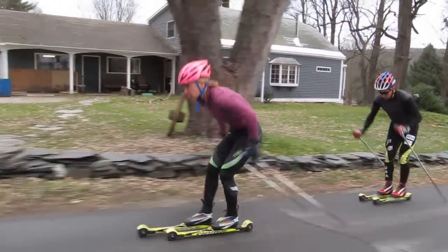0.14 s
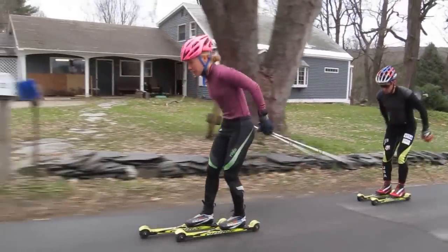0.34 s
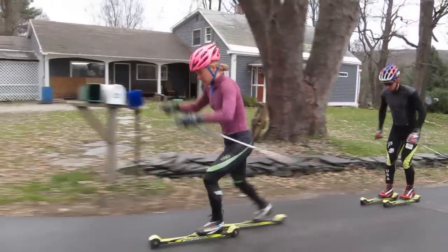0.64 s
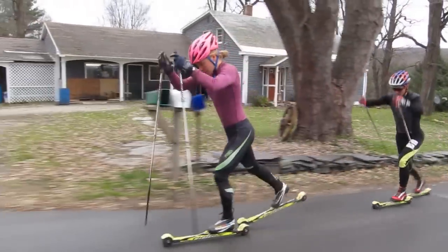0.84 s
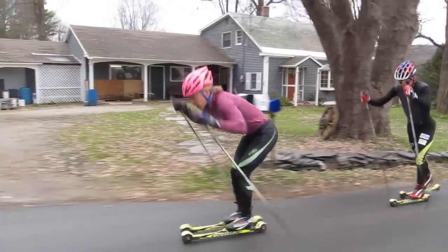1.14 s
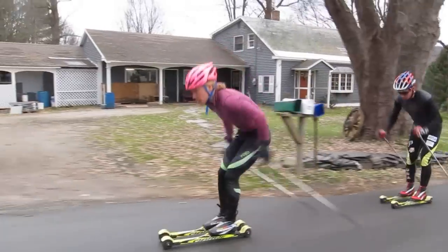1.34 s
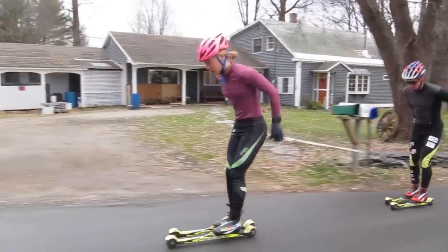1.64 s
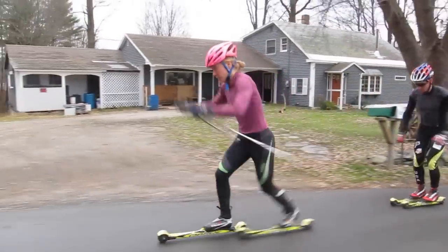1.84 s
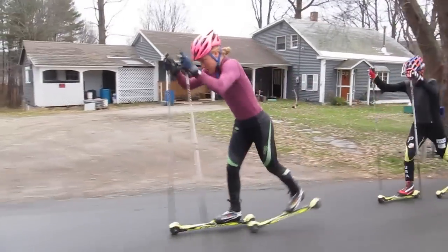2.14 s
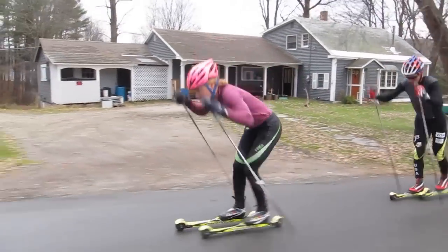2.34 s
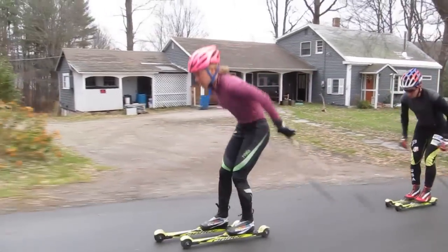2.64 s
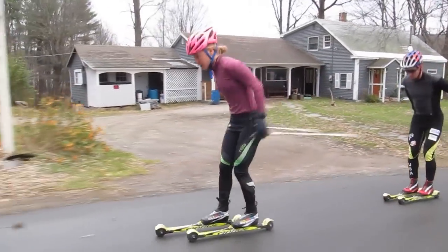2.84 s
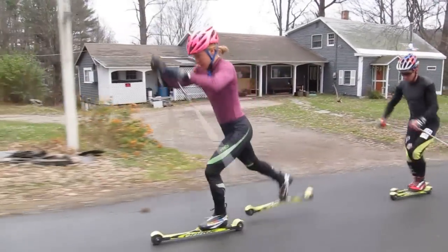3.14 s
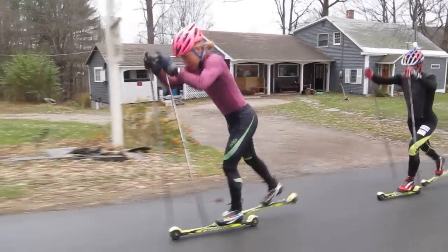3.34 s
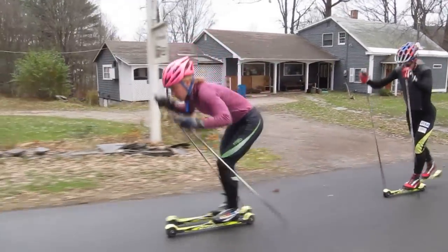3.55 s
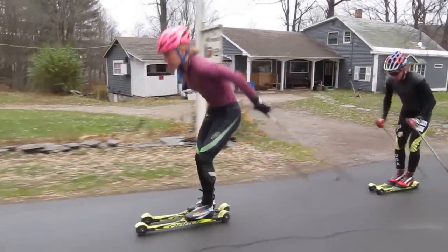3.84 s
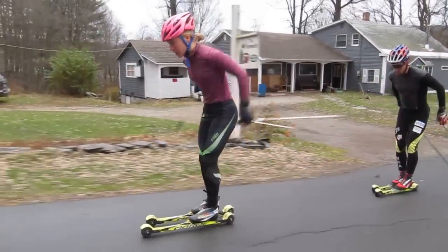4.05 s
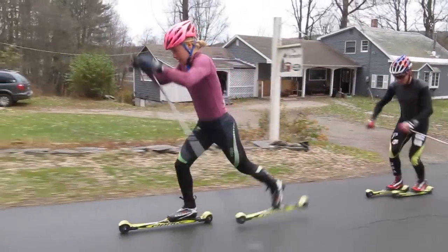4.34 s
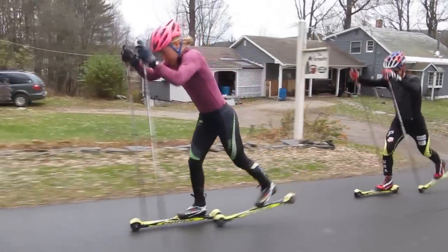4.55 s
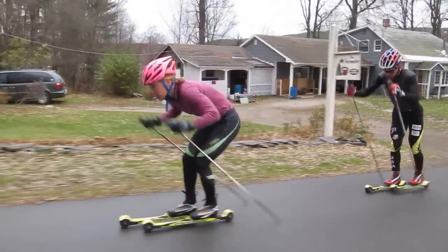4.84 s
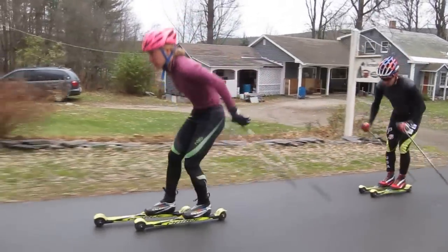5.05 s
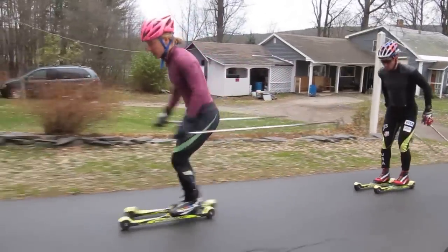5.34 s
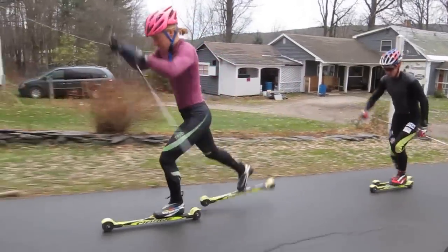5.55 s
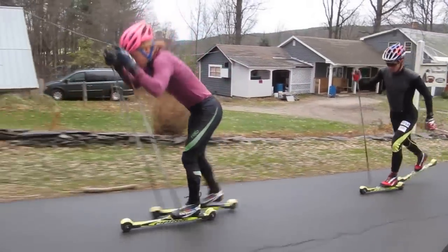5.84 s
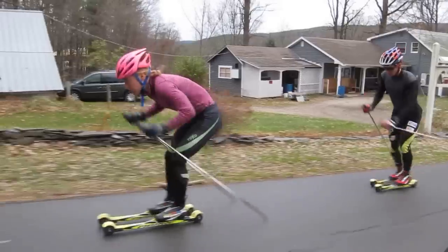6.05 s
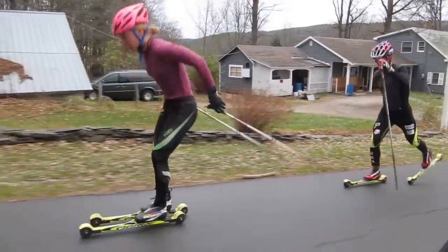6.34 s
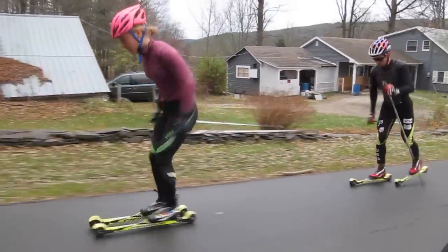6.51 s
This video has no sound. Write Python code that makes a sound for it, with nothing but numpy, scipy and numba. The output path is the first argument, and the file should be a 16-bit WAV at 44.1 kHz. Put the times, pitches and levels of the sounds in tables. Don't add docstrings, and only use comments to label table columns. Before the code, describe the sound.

Two roller skiers travel beside the microphone on a wet road. Loud irregular gusts slap and thud at first, nearly hiding the rolling. After they ease, small wheels hiss and drone softly, spitting tiny grit clicks. Paired sharp pole plants ring briefly and dry in a steady rhythm, the farther ones often loudest. A short flurry of wind bumps returns at the end.

```python
import sys
import numpy as np
from scipy import signal
from scipy.fft import rfft, irfft, next_fast_len
from scipy.io import wavfile
from scipy.ndimage import uniform_filter1d
from numba import njit

SR = 44100
rng = np.random.default_rng(int(sys.argv[2]) if len(sys.argv) > 2 else 0)


def pcm_store(signal):
    levels = np.round(np.clip(np.atleast_2d(signal), -1, 1) * 32767)
    wavfile.write(sys.argv[1], SR, levels.astype(np.int16).T)


def makeup_ratio(level_db):
    decades = np.asarray(level_db, float) / 20
    return 10 ** decades


N = 294588


def level(x, db):
    return x * makeup_ratio(db) / np.sqrt(np.mean(x ** 2))


def curve(table):
    return np.interp(np.arange(N) / SR, *np.transpose(table))


def colour(x, points):
    hz, db = np.transpose(points)
    size = next_fast_len(x.shape[-1])
    f = np.log(np.maximum(np.arange(size // 2 + 1) * SR / size, 1))
    gain = makeup_ratio(np.interp(f, np.log(hz), db, -90, -90))
    return irfft(rfft(x, size) * gain, size)[..., :x.shape[-1]]


def walk(rate):
    k = int(SR / rate)
    steps = np.repeat(rng.standard_normal(N // k + 1), k)
    return 1.2 * uniform_filter1d(uniform_filter1d(steps, k), k)[:N]


def pair(alike, lead):
    common, left, right = rng.standard_normal((3, N))
    shared = np.array([np.roll(common, -lead), common])
    return np.sqrt(alike) * shared + np.sqrt(1 - alike) * np.array([left, right])


@njit
def svf(x, hz, damp):
    low, band, b, l = np.empty(len(x)), np.empty(len(x)), 0., 0.
    for i in range(len(x)):
        g = np.tan(np.pi * hz[i] / SR)
        v = (b + g * (x[i] - l)) / (1 + g * (g + damp))
        low[i], band[i] = l + g * v, damp * v
        b, l = 2 * v - b, l + 2 * g * v
    return low, band


def brighten(rows, neutral_db, slope):
    return [(s, db, ms, slope * (db - neutral_db)) for s, db, ms in rows]


def churn(trim_db):
    per_s, ends_s, fade_db_per_s, length_ms, bright_db = 36, 2.35, 2, 3.6, -20.5
    count = int(per_s * ends_s)
    place, size = rng.random((count, 2)).T
    s = (np.arange(count) + place) / per_s
    db = -25 + trim_db - fade_db_per_s * s - 5 * (2 * size - 1)
    return [(a, b, length_ms, bright_db) for a, b in zip(s, db)]


def wind(gusts, per_s=1000, spread_db=4.0, corner_hz=620, db_per_octave=12.0, taper=0.32):
    power, octaves = np.full(N, 1e-9), np.zeros(N)
    for s, db, ms, bright_db in gusts:
        i = np.arange(max(int((s - .12) * SR), 0), min(int((s + 0.067) * SR), N))
        late = (i / SR - s) * 1000 / ms + .3
        fall = np.minimum(.5 * (late * np.where(late < 0, 1.5, .8)) ** 2, 4)
        gust_power = makeup_ratio(2 * db) * np.exp(-fall) * (fall < 4)
        power[i] += gust_power
        octaves[i] += gust_power * (bright_db / db_per_octave - taper * fall)
    hz = np.clip(corner_hz * 2 ** (octaves / power + 0.29 * walk(160)), 70, 3000)
    chance = rng.random((3, N))
    hearts = [int(g[0] * SR) for g in gusts]
    chance[:, hearts] = [[0], [.9], [.4]]
    sizes = makeup_ratio(-spread_db * np.log(0.3 + chance[2]))
    kicks = (chance[0] < per_s / SR) * -np.sign(chance[1] - .3) * sizes
    driven = level(kicks * makeup_ratio(2.0 * walk(110)), 0) * np.sqrt(power / hz)
    hump = svf(driven, hz, 2.77)[1]
    pops = svf(svf(hump, 2.3 * hz, 1.25)[0], 4.16 * hz, 0.72)[0]
    leak = signal.butter(1, 70, "highpass", fs=SR, output="sos")
    return makeup_ratio(37.0) * signal.sosfilt(leak, pops)


def eddies(air, rows):
    out, span = air.copy(), np.arange(-300, 300)
    t = span / SR
    for (s, db, hz), turn in zip(rows, rng.random(len(rows))):
        i = int(s * SR) + span
        bell = np.exp(-.5 * (t * hz / 0.4) ** 2)
        edge = np.exp(-.5 * (t * hz / 0.24) ** 2) * np.cos(2 * np.pi * (2.37 * hz * t + turn))
        swing = bell * np.cos(2 * np.pi * (hz * t + turn))
        swing = swing + makeup_ratio(-10.5 + 0.84 * db) * edge
        out[i] = out[i] * (1 - bell ** .5) + makeup_ratio(db - 1.5) * swing
    return out


def left_wind():
    # (t/s, level/dB, half length/ms)
    strong = [(0.0, -11, 21.5), (.098, -18, 14.8), (.197, -17.5, 19), (.255, -22, 3.5), (.291, -11, 12.1),
              (.345, -14.5, 16), (.422, -28, 16), (.514, -13.5, 9.7), (.552, -19.5, 36), (.605, -14.5, 28),
              (.76, -13, 2.8), (.782, -14, 10), (.848, -17.5, 19), (.901, -13.5, 9.1), (.942, -12.5, 8.8),
              (.988, -20.5, 110), (1.008, -14.5, 5.2), (1.069, -15.5, 11.6), (1.105, -21, 12.3),
              (1.235, -16, 9.6), (1.304, -18.5, 4), (1.409, -15.5, 13.2), (1.487, -17, 12),
              (1.547, -17.5, 7.6), (1.634, -16, 6.3), (1.706, -18, 4), (1.775, -14.5, 12.8),
              (1.821, -21, 18), (1.954, -14.5, 8.8), (2.033, -21.5, 4.4)]
    # (t/s, level/dB,
    # half length/ms, brightness/dB)
    puffs = [(.476, -20.5, 6.3, -15.5), (.722, -19.5, 10.5, -9.5), (.665, -21.5, 60, -11),
             (1.578, -25, 8, -3.5), (1.87, -23.5, 6.4, 0), (1.906, -22.5, 5.1, -9.5),
             (1.991, -19.5, 22, -6.5), (2.078, -32, 2.6, -6), (3.33, -34, 14, -26), (2.144, -25, 7.4, -1.5),
             (2.207, -23.5, 4.8, -10), (2.309, -24.5, 4.1, -10.5), (2.459, -33.5, 21, -26.5),
             (2.673, -19, 1.3, -13), (2.683, -19.5, 2.1, -10.5), (3.331, -23, 2.5, 14),
             (4.317, -32.5, 2.8, 4), (3.094, -29, 4.7, -27), (3.77, -33, 2.9, -23), (3.945, -25, 2.8, -24),
             (4.385, -31, 15, -31.5), (4.406, -35, 4, -25), (4.873, -30, 4.5, -32),
             (5.742, -20.5, 2.9, -24), (6.091, -31, 16, -24.5), (6.218, -22.5, 3.4, -11.5),
             (6.381, -21, 13.3, -14), (6.457, -22.5, 9.7, -17), (6.526, -16, 2.6, -32)]
    # (t/s, peak/dB, pitch f/Hz)
    slaps = [(0.0085, -18, 990), (0.02, -14, 1110), (0.1007, -3.5, 1160), (0.1205, -24, 830),
             (0.1705, -2, 840), (0.2037, -9, 1160), (0.2174, -7.5, 1040), (0.2528, -13, 600),
             (0.2853, 2.5, 1210), (0.3022, -9, 990), (0.3297, -5, 1010), (0.3595, -3, 1100),
             (0.391, -16, 720), (0.5054, -4, 1120), (0.5182, -3, 1160), (0.5925, -6.5, 1130),
             (0.6024, -1.5, 970), (0.625, -8, 1210), (0.64, -6, 690), (0.7294, -10, 540), (0.7595, -9, 690),
             (0.7791, -2, 980), (0.8311, -3.5, 810), (0.849, -5, 1120), (0.8888, -4, 990),
             (0.8993, -0.5, 1120), (0.9083, -4, 920), (0.9414, -6, 970), (0.951, -5, 1060),
             (1.0114, -3.5, 1140), (1.0376, -4.5, 726), (1.0657, -6, 970), (1.22, -7, 745),
             (1.2308, -4.5, 1110), (1.2423, -6.5, 1220), (1.301, -4, 840), (1.397, -4, 1040),
             (1.4084, -3.5, 1240), (1.418, -4.5, 1010), (1.4731, -4.5, 685), (1.4817, -3, 950),
             (1.4974, -7.5, 900), (1.5465, -7.5, 670), (1.582, -12, 800), (1.6292, -3.5, 1010),
             (1.7033, -12, 870), (1.7758, -5, 1290), (1.8353, -9.5, 720), (1.8715, -11, 860),
             (1.954, -6, 1130), (1.9823, -7, 980), (2.0337, -7, 940), (2.3132, -12.5, 740),
             (2.6777, -8, 550), (6.2205, -20, 610), (6.3797, -9, 606)]
    # (t/s, peak/dB, pitch f/Hz)
    last_slaps = [
        (2.681, -8.5, 800),
        (6.373, -16, 795),
        (6.394, -17, 600),
        (6.459, -19, 540),
    ]
    air = wind(brighten(strong, neutral_db=-13.5, slope=0.54) + puffs + churn(trim_db=-3.0))
    return eddies(air, slaps + last_slaps)


def right_wind():
    # (t/s, level/dB, half length/ms)
    strong = [(.053, -21, 18), (.099, -21, 6.4), (.187, -11.5, 2.6), (.241, -22.5, 8.1), (.304, -20, 27),
              (.368, -15, 5.6), (.41, -21, 11.4), (.456, -25, 5.5), (.535, -18.5, 8.9), (.577, -15.5, 15),
              (.654, -24, 6.9), (.716, -19, 11), (.795, -21.5, 24), (.878, -28, 12), (.919, -19, 12),
              (.976, -21.5, 21), (1.035, -20.5, 16), (1.164, -33, 4.7), (1.25, -22.5, 6.8),
              (1.31, -19.5, 13.2), (1.427, -14, 3), (1.515, -39, 46), (1.595, -37, 12), (1.654, -19, 1.4),
              (1.687, -33, 1.9), (1.736, -32, 9.9), (1.814, -18.5, 15), (1.861, -22.5, 7.1),
              (1.985, -30, 9.7), (2.068, -30, 3.4)]
    # (t/s, level/dB, half length/ms, brightness/dB)
    puffs = [(2.106, -35, 1.5, -18), (2.176, -30, 6.5, -8), (2.23, -25, 13.7, -15), (2.371, -29, 1.6, -19),
             (2.708, -29, 3.1, -26), (2.74, -28.5, 6.6, -20), (3.4, -33, 15, -28), (4.446, -32.5, 4.7, -17),
             (6.249, -26, 8.8, -19), (6.274, -26, 1.6, -15), (6.416, -14, 3.4, -12),
             (6.48, -24.5, 6.6, -35), (6.549, -30.5, 14, -27.5)]
    # (t/s, peak/dB, pitch f/Hz)
    slaps = [(0.0524, -5, 990), (0.0936, -12, 880), (0.1866, -12, 1010), (0.2313, -19, 510),
             (0.2932, -6, 790), (0.305, -12, 810), (0.3735, -6.5, 690), (0.459, -13.5, 590),
             (0.5664, -10, 604), (0.5767, -4.5, 420), (0.7794, -16, 560), (0.7979, -8.5, 480),
             (0.874, -16, 490), (0.919, -8, 980), (0.959, -19, 540), (1.0937, -17, 610), (1.1612, -18, 570),
             (1.2476, -7, 505), (1.3594, -18.5, 550), (1.4253, -11, 600), (1.4335, -14, 550),
             (1.5857, -15.5, 510), (1.6545, -18, 650), (1.8109, -14, 720), (1.9658, -18, 670),
             (2.217, -28, 550), (2.744, -21, 530), (6.2451, -22, 490)]
    # (t/s, peak/dB, pitch f/Hz)
    last_slaps = [
        (6.255, -28, 500),
        (6.274, -22, 350),
        (6.409, -8, 560),
        (6.4196, -11, 400),
    ]
    air = wind(brighten(strong, neutral_db=2.4, slope=0.48) + puffs + churn(trim_db=-2.0))
    return eddies(air, slaps + last_slaps)


def wheels():
    # (t/s, spray level/dB)
    roll = [(0, -62.5), (.65, -63.5), (1.0, -63), (1.78, -67), (1.95, -59.5), (2.11, -69.5), (2.42, -55.5),
            (3.42, -62), (3.66, -50), (4.1, -57), (4.39, -48), (4.56, -53.5), (4.95, -44), (5.21, -52.5),
            (5.55, -48.5), (5.86, -53), (6.25, -47), (6.68, -57.5)]
    # (f/Hz, density/dB)
    hiss_colour = [(1060, -25), (1800, -5), (1890, -53), (2110, -14), (2610, -9), (4850, -4.5),
                   (7500, -12.5), (9750, -37), (16500, -120)]
    # (f/Hz, density/dB)
    spray_colour = [(6000, -52), (8000, -17), (10000, -1.5), (12000, -1), (14000, -8.5), (15850, -15)]
    spray_db = curve(roll) + 1.6
    hiss_db = -52.5 + 0.56 * (spray_db + 54)
    grain = makeup_ratio(1.3 * walk(150) + 0.45 * walk(25))
    hiss = level(colour(pair(0.31, lead=0), hiss_colour), 0.99) * makeup_ratio(hiss_db)
    spray = level(colour(pair(0.26, lead=5), spray_colour), 0.97)
    spray = spray * makeup_ratio(spray_db + np.array([[-.4], [.4]]))
    spatter = makeup_ratio(0.5 * walk(110) + 2.6 * walk(400))
    return grain * (hiss + spray * spatter)


def drone():
    # (t/s, level/dB)
    swell = [
        (2.35, -46),
        (5.7, -41.5),
        (5.85, -46),
        (6.68, -42),
    ]
    # (f/Hz, density/dB)
    rumble_colour = [(12, -41), (20, -10.5), (43, 0.5), (141, 1.5), (166, -7), (376, -3), (474, -2),
                     (561, -11), (677, -6.5), (801, -11), (988, -3), (1140, -8.5), (3000, -16), (3900, -21),
                     (6600, -120)]
    # (multiple of whine_hz, level/dB)
    overtones = [(1, 4), (2, -7), (3, -10), (4, -3), (5, 1.5)]
    whine_hz = 336
    rumble = level(colour(pair(0.96, lead=4), rumble_colour), 1.43)
    whine = 0
    for k, db in overtones:
        cycles = np.cumsum(k * whine_hz * (1 + .008 * walk(3)) + 14.0 * k * walk(90)) / SR
        whine = whine + makeup_ratio(db + 2.0 * walk(19)) * np.sin(2 * np.pi * cycles)
    balance_db = np.array([[.7], [-.7]])
    return (rumble + level(whine, -8.5)) * makeup_ratio(curve(swell) + 0.83 * walk(9.9) + balance_db)


def spits(rows, points, trim_db, spread):
    power, span = np.zeros(N), np.arange(-1200, 1200)
    t_ms = span / SR * 1000
    for s, db, ms in rows:
        i = np.maximum(int(s * SR) + span, 0)
        power[i] += makeup_ratio(2 * db) * np.exp(-(t_ms / (spread * ms)) ** 2)
    return level(colour(pair(0.82, lead=-1), points), trim_db) * np.sqrt(power)


def flung_grit():
    # (t/s, level/dB, length/ms)
    flung = [(0.02, -36, 3), (0.0837, -43, 1.9), (0.1465, -40, 2.1), (0.1662, -46, 2.0), (0.1902, -48, 3.9),
             (0.2057, -47, 2.4), (0.2451, -40, 2.0), (0.4059, -47, 2.3), (0.4397, -42, 1.7),
             (0.5215, -43, 3.8), (0.5499, -41, 2.1), (0.5569, -47, 0.9), (0.5642, -45, 0.9),
             (0.6889, -43, 4.4), (0.8104, -49, 1.6), (0.829, -46, 2.8), (0.8717, -58, 1.7),
             (0.9478, -52, 0.7), (0.9542, -58, 0.99), (1.0313, -50, 2.5), (1.0483, -50, 2.7),
             (1.0816, -29, 1.1), (1.0909, -41, 1.7), (1.0977, -53, 1.3), (1.1122, -53, 1.8),
             (1.1206, -52, 1.8), (1.4147, -38, 2.2), (1.766, -45, 7.9), (1.7751, -51, 1.6),
             (1.7855, -48, 1.5), (1.7939, -57, 1.3), (1.8998, -42.5, 3.9), (1.9456, -40, 1.6),
             (2.8864, -45, 1.9), (2.9732, -42, 1.8), (3.0435, -47, 1.6), (3.0873, -45, 1.8),
             (3.1027, -38, 5.2), (3.1227, -44, 3.1), (3.1367, -42, 2.1), (3.2324, -40, 2.6),
             (3.2385, -40, 1.8), (3.3417, -50, 1.4), (3.4424, -45, 1.5), (3.4501, -39, 2.4),
             (3.7948, -44, 1.6), (4.698, -31, 1.9), (4.7154, -37, 1.5), (4.734, -30, 1.6),
             (4.7603, -26, 1.6), (5.412, -33, 1.8), (5.4737, -35, 1.3), (5.5068, -27, 1.9),
             (5.5406, -36, 3.4), (5.72, -39, 1.3), (6.2408, -28, 1.2), (6.2907, -35, 2), (6.5787, -31, 2.5),
             (6.5866, -28.5, 1.9), (6.5946, -54, 1),
             (2.797, -50, 2), (3.491, -45, 4.3), (4.309, -40, 3), (4.352, -44, 2), (4.396, -41, 3),
                  (4.624, -39, 2), (4.684, -43, 4), (4.975, -41, 3), (5.312, -42, 3), (5.453, -37, 2),
                  (5.579, -39, 2), (5.672, -40, 1.5)]
    # (f/Hz, density/dB)
    spit_colour = [(3000, -30), (7000, -10), (9000, -2), (11000, 4.5), (13500, -8), (16000, -14)]
    return spits(flung, spit_colour, trim_db=0.4, spread=0.29)


def ticks(rows, treble_db, tail_db):
    ring_hz = rng.uniform(2060, 6100, len(rows))
    return [(s, db, treble_db, tail_db, hz) for (s, db), hz in zip(rows, ring_hz)]


def poles(strikes, shaft, tip_hz, suddenness, tip_db, bite_hz, follow, lags, left_db):
    out, t = np.zeros((2, N + 4096)), np.arange(3000) / SR
    hz, mode_db, t60 = np.transpose(shaft)[:, :, None]
    low = signal.butter(2, [1250, 7200], "bandpass", fs=SR, output="sos")
    high = signal.butter(2, [9000, 1.26 * tip_hz], "bandpass", fs=SR, output="sos")
    tail = makeup_ratio(-60 * t / 0.02) * (1 - np.exp(-(t / 0.0013) ** 2))
    fade = tail + makeup_ratio(-33 - 60 * t / 0.023)
    crack = np.exp(-.5 * ((t * 1000 - .35) / .1) ** 2)
    tip_crack = crack ** suddenness * np.sin(2 * np.pi * tip_hz * t)
    tip_ring = makeup_ratio(-60 * t / 0.024) * np.sin(2 * np.pi * 9750 * t)
    for s, db, treble_db, tail_db, ring_hz in strikes:
        chance, grit = rng.standard_normal((2, len(hz), 1)), rng.standard_normal((4, len(t)))
        modes = makeup_ratio(mode_db + 3 * chance[0] - 60 * t / t60) * np.sin(2 * np.pi * hz * (1 + .03 * chance[1]) * t)
        bend = makeup_ratio(8.0 - 60 * t / 0.021) * np.sin(2 * np.pi * ring_hz * t)
        ring = modes.sum(0) + bend
        grind = makeup_ratio(tail_db + 9.5) * fade * (1.31 * grit[0] + 0.67 * grit[1:3]) * makeup_ratio(1.9 * grit[3])
        crack_hz = bite_hz * (max(ring_hz, 3000) / bite_hz) ** follow
        bite = 1.55 * crack * (np.sin(2 * np.pi * crack_hz * t) + 0.076)
        dull = signal.sosfilt(low, bite + grind + makeup_ratio(tail_db - 5) * ring)
        sharp = signal.sosfilt(high, 2.35 * tip_crack + 0.14 * fade ** .5 * grind + 0.1 * tip_ring)
        treble = makeup_ratio(treble_db + np.array(tip_db)[:, None])
        hit = makeup_ratio(db + np.array([[left_db], [0]])) * (dull + treble * sharp)
        lag = np.interp(s, *np.transpose(lags))
        delay = np.exp(-1j * np.pi * lag * np.linspace(0, 1, len(t) // 2 + 1))
        hit[0] = irfft(rfft(hit[0]) * delay, len(t))
        i = int((s - .0005) * SR)
        out[:, i:i + len(t)] += hit
    return out[:, :N]


def rear_skier():
    # (t/s, peak/dB, treble share/dB, grinding tail/dB, shaft ring f/Hz)
    plants = [(1.0738, 0, -18, -18.5, 4480), (1.0915, -30, -14, -1.5, 3400), (2.2526, -15, -2, -11.5, 5400),
              (2.2546, -26.5, -21, -3.5, 4700), (2.267, -19.5, 0, -8, 3900), (3.5394, -3.5, -17, -13, 3860),
              (3.548, -16.5, -12, -11, 2970), (4.7561, -15, -23, -3, 4130), (4.7576, 0.5, -8, -19.5, 3630),
              (4.7686, -19, -14, -11, 3600), (5.0436, -17.5, 4.5, -15, 5330),
              (5.0485, -22.5, -17, -12, 4860), (5.8628, 2, -14, -17.5, 3270), (5.871, -24, -16, -16, 3000),
              (6.4104, -6.5, -14, -11, 3900)]
    # (t/s, peak/dB)
    clacks = [(.0207, -38), (.1378, -41), (.1892, -34), (.2057, -36), (1.0476, -38), (1.3946, -41),
              (1.4138, -35.5), (2.6347, -38.5), (3.1034, -35), (3.122, -38), (3.2387, -40), (3.7946, -33),
              (4.309, -35), (6.6335, -32.5)]
    # (f/Hz, level/dB, t60/s)
    shaft_modes = [(2290, -15.5, 0.097), (3830, -7, 0.031), (5820, -27, 0.016)]
    # (t/s, delay of the left port/samples)
    drift = [
        (4.8, 1.8),
        (6.4, 2.2),
    ]
    strikes = plants + ticks(clacks, treble_db=-26, tail_db=-3)
    return poles(strikes, shaft_modes, tip_hz=11800, suddenness=3.7, tip_db=(1.5, 3.2),
                 bite_hz=4970, follow=0.2, lags=drift, left_db=-2.0)


def front_skier():
    # (t/s, peak/dB, treble share/dB, grinding tail/dB, shaft ring f/Hz)
    plants = [
        (.9329, -5.5, -8, -20.5, 3590),
        (.9394, -33.5, 21, 7.5, 5600),
        (2.1294, -31.5, 15, 2.5, 3150),
        (3.3263, -7, -7, -15.5, 3340),
        (3.332, -21, 15.5, 0.5, 1390),
        (4.188, -32, 3, -7.5, 5100),
        (4.5595, -7.5, -6, -12, 5680),
        (4.5613, -13.5, 12, -9.5, 3850),
        (4.566, -24, 6, -12, 3500),
        (5.7592, -8.5, -16, -15.5, 4400),
    ]
    # (t/s, peak/dB, treble share/dB, grinding tail/dB, shaft ring f/Hz)
    glancing = [
        (2.1433, -11, -4.5, -20, 3400),
        (5.7563, -15.5, 9, -5.5, 5770),
    ]
    # (t/s, peak/dB)
    grit_ticks = [(.1464, -44), (.2454, -37), (.55, -38), (1.7663, -34.5), (1.8998, -40), (1.9285, -44),
                  (3.1374, -35), (3.2326, -41), (3.4501, -37), (.5214, -42), (4.698, -36), (4.7341, -47),
                  (4.9748, -29.5), (5.4121, -37), (5.4736, -45), (5.5068, -31.5), (5.5408, -39),
                  (6.2404, -28.5), (6.25, -44), (6.2906, -41), (6.5787, -28), (6.5865, -31)]
    # (f/Hz, level/dB, t60/s)
    shaft_modes = [(2290, -8, .04), (3120, -2, .03), (5500, -10, .02)]
    # (t/s, delay of the left port/samples)
    drift = [
        (0, -.75),
        (3.4, -.6),
        (5.8, -1.35),
    ]
    strikes = plants + ticks(grit_ticks, treble_db=-12, tail_db=-10.5)
    firm = poles(strikes, shaft_modes, tip_hz=10500, suddenness=2.3, tip_db=(0.0, 0.0),
                 bite_hz=4400, follow=0.36, lags=drift, left_db=-1.5)
    singing = poles(glancing, shaft_modes, tip_hz=9900, suddenness=.9, tip_db=(0.0, 0.0),
                    bite_hz=5100, follow=0.27, lags=drift, left_db=-0.5)
    return firm + singing


def scuffs():
    # (t/s, level/dB, length/ms)
    drags = [(.558, -47, 33), (.968, -46, 14), (1.088, -34, 18), (1.113, -44, 10), (2.887, -49, 2),
             (2.97, -49.5, 16), (3.103, -42, 4.4), (3.795, -42, 4.4), (4.19, -41, 5), (4.31, -45, 4),
             (4.328, -41, 3), (5.025, -43, 3), (5.878, -40, 8), (6.368, -45, 4), (6.424, -35, 14)]
    # (f/Hz, density/dB)
    drag_colour = [(1500, -18), (2600, 2.5), (4500, 0), (6500, -1), (8000, -22), (11000, -8), (15000, -22)]
    return spits(drags, drag_colour, trim_db=0.1, spread=0.41)


def scene():
    air = np.array([left_wind(), right_wind()])
    rolling = wheels() + drone() + flung_grit()
    skiers = rear_skier() + front_skier() + scuffs()
    return air + rolling + skiers


def top_cut(x):
    return signal.sosfilt(signal.butter(12, 16460, fs=SR, output="sos"), x)


def record(dry):
    # (t/s, gain drop/dB)
    ducks = [
        (0.287, 1.5),
        (0.935, 1.5),
        (1.076, 0),
        (3.545, 2),
        (4.565, 2),
        (4.766, 5),
        (5.87, 3.5),
    ]
    attack_s, recover_s, notch_hz, notch_width_hz = 0.0058, 0.31, 8200, 410
    t = np.arange(N) / SR
    duck_db = 0
    for s, db in ducks:
        duck_db = duck_db + db * np.clip((t - s) / attack_s, 0, 1) * np.exp(-np.maximum(t - s, 0) / recover_s)
    mix = dry * makeup_ratio(-duck_db)
    for q in (notch_hz / notch_width_hz, 13.0):
        mix = signal.lfilter(*signal.iirnotch(notch_hz, q, fs=SR), mix)
    mix = signal.sosfilt(signal.butter(8, 16100, fs=SR, output="sos"), mix)
    return top_cut(np.clip(mix, -1, 1))


dry = scene()
out = record(dry)
pcm_store(out)
```